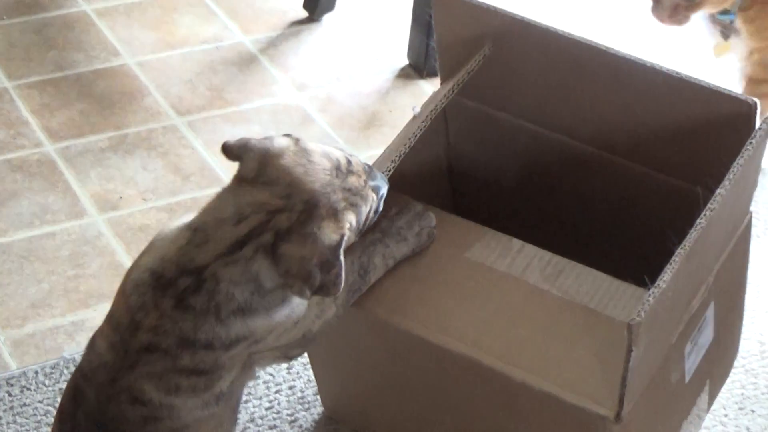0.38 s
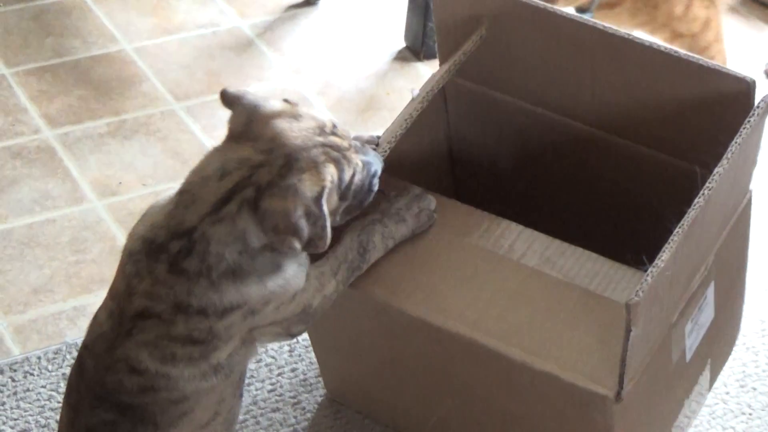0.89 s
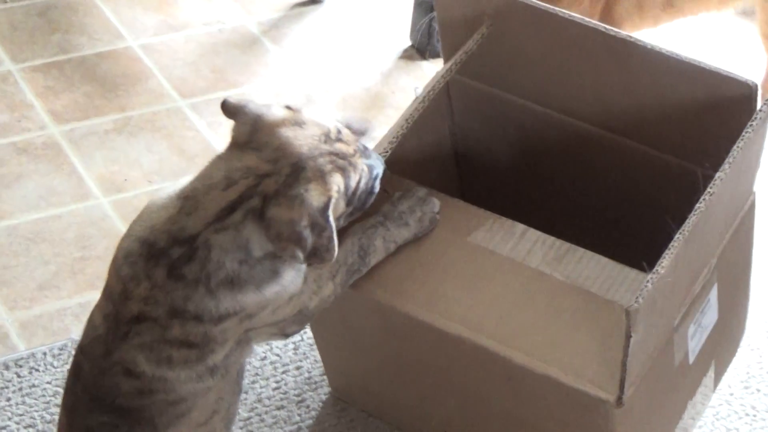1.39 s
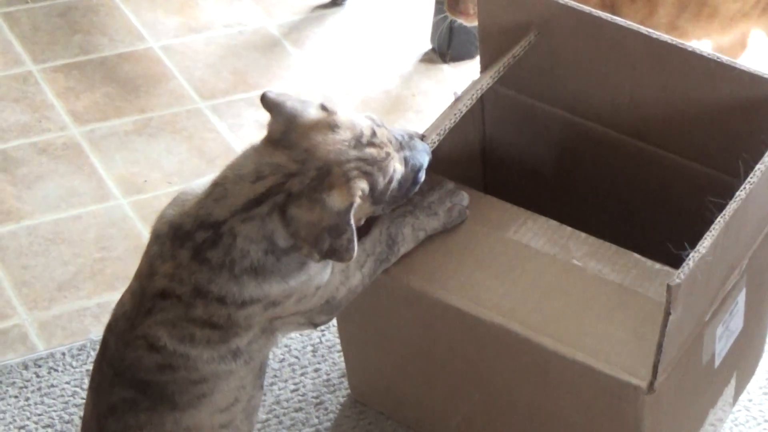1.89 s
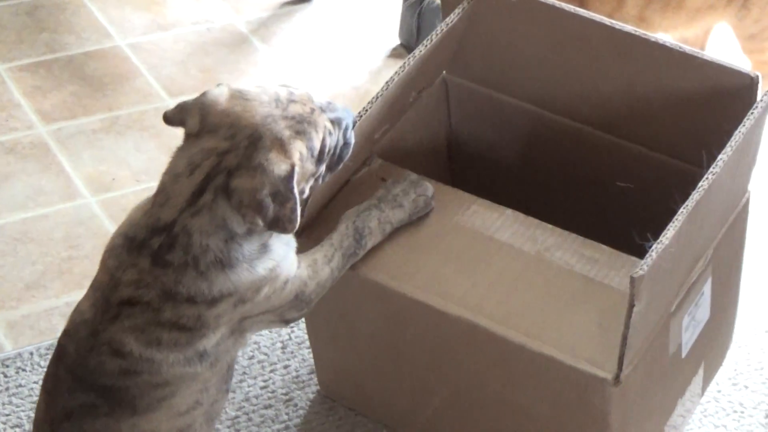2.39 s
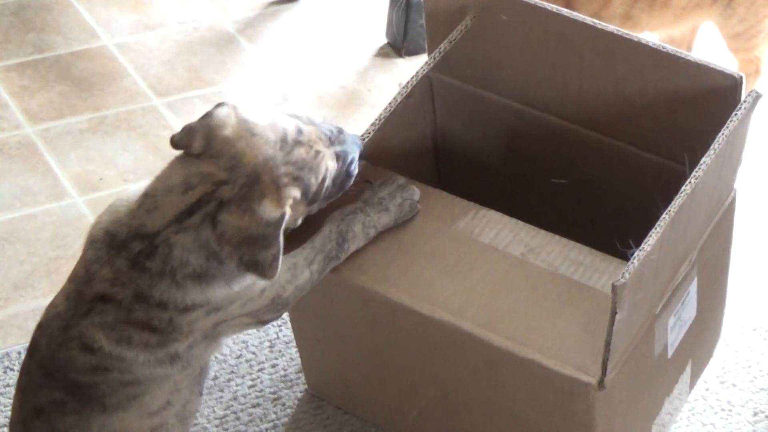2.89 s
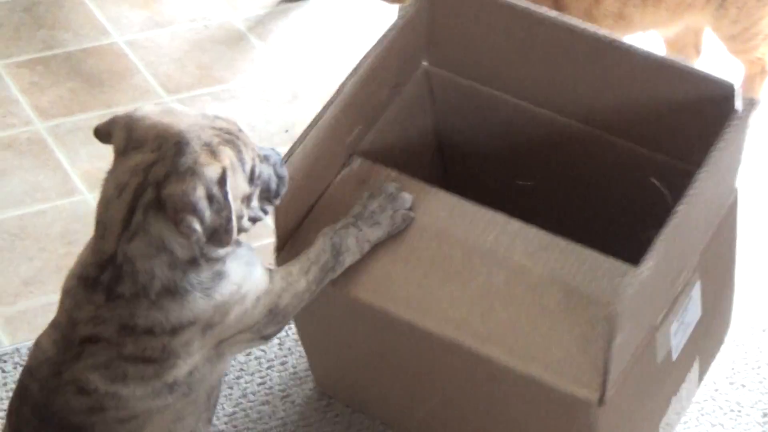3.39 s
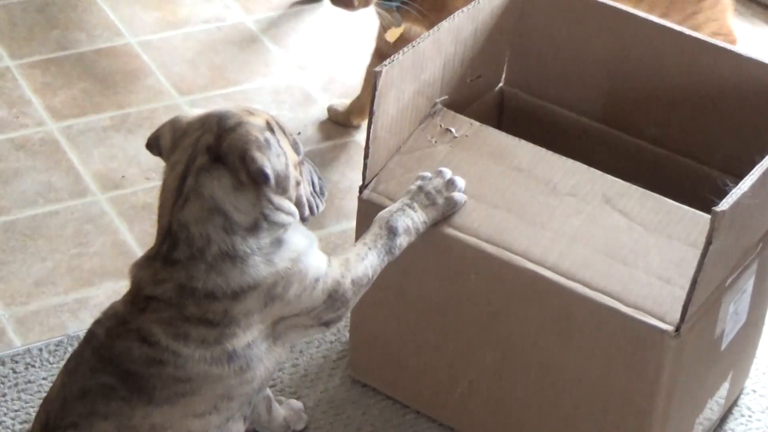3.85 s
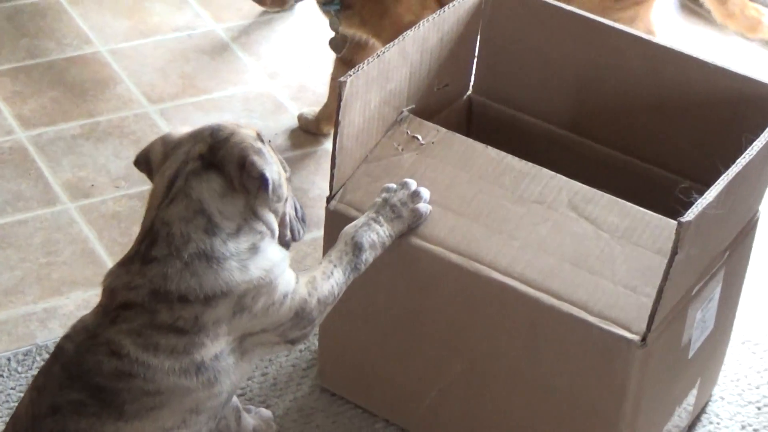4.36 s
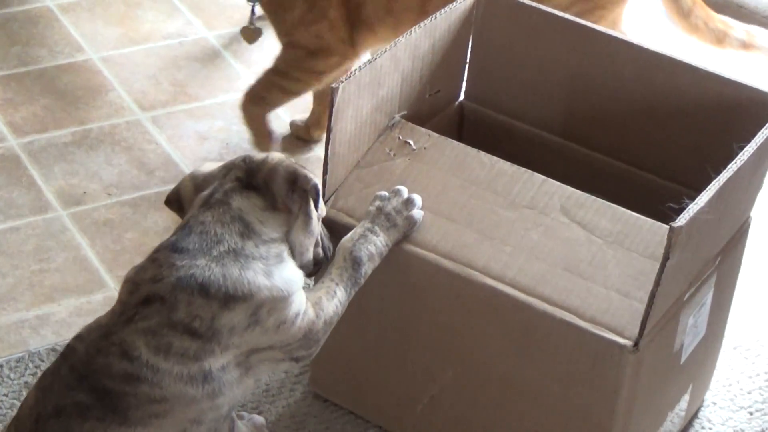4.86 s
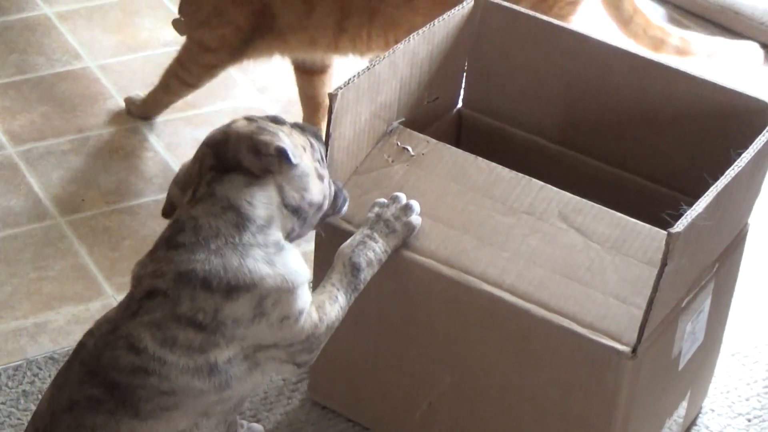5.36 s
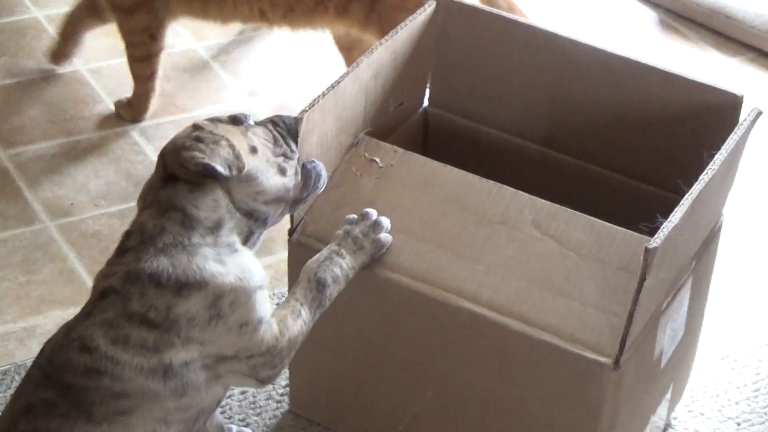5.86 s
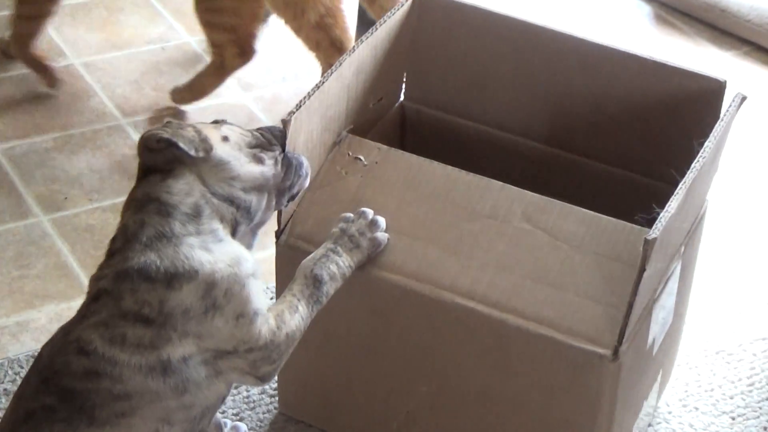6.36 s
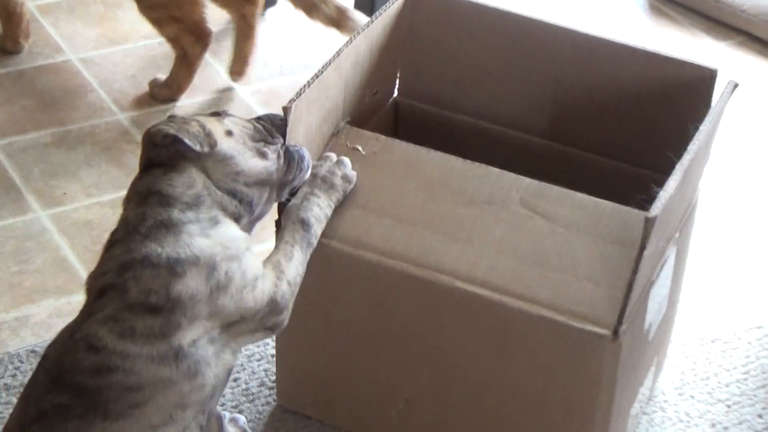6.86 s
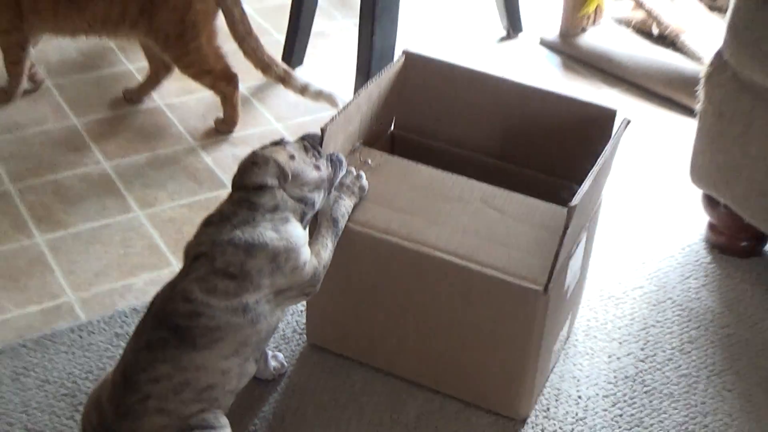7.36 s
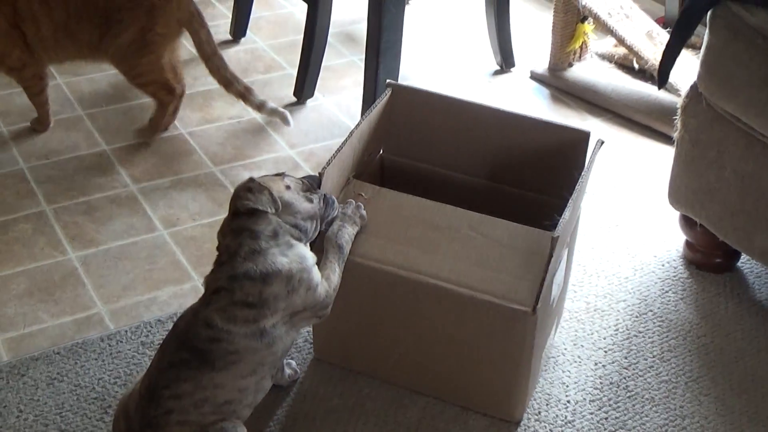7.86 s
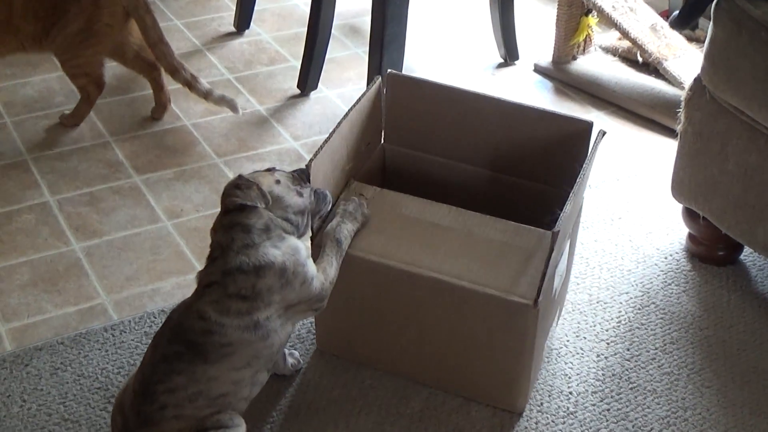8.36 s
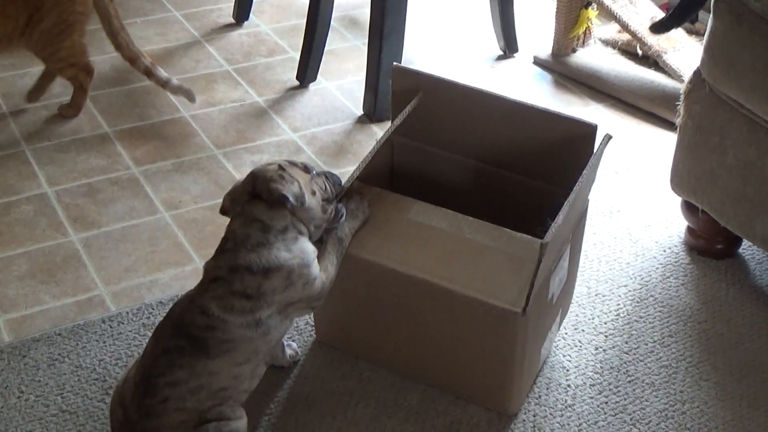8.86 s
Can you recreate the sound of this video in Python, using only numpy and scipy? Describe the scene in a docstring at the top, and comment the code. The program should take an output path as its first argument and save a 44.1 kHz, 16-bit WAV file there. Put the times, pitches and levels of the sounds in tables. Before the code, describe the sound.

A puppy paws and mouths an empty cardboard box in a quiet home. Sparse crisp ticks and short papery scrapes come first, then a busy burst with skids and a rumble as the box jerks on carpet. After a near-silent lull, scratches and hollow knocks return, denser towards the end. A low appliance hum and faint hiss continue throughout. Close microphone, small dry room.

```python
"""An appliance hums and air hisses throughout a quiet room; a puppy's leaning body faintly rustles on a box.
First ticks, then a knock at about half a second: claws and teeth crack on the cardboard and ring its panels,
while fur, pads and nose rub it in noisy strokes and skids. From 3.3 s the base also rumbles in jerks on carpet.
A lull from about 4 to 5.3 s precedes more rubbing, skids and knocks, with the loudest tick near 7.2 s.
Ticks are filtered noise bursts, knocks decaying modes, rubbing and jerks shaped noise, the hum steady sines."""
import sys
import numpy as np
from scipy import signal
from scipy.fft import rfft, irfft, next_fast_len
from scipy.io import wavfile
from scipy.ndimage import uniform_filter1d

SR = 44100
rng = np.random.default_rng(int(sys.argv[2]) if len(sys.argv) > 2 else 0)


def output_pcm(signal):
    """Save a mono or channel-first signal as 16-bit PCM at the path in sys.argv[1].

    Samples are clipped to [-1, 1] before scaling.
    """
    pcm = np.clip(np.atleast_2d(signal).T, -1, 1) * 32767
    wavfile.write(sys.argv[1], SR, np.round(pcm).astype(np.int16))


def magnitude_from_level(level_db):
    """Linear magnitude for a level in decibels (20 dB per decade)."""
    exponent = np.asarray(level_db, float) / 20
    return 10 ** exponent


N = 407484
T = np.arange(N) / SR
GRID = 32  # samples between envelope points


def colour(x, points):
    """Linear filtering: a gain curve through (frequency [Hz], gain [dB]) points shapes the spectrum."""
    hz, db = np.transpose(points)
    f = np.maximum(np.arange(len(x) // 2 + 1) * SR / len(x), 1)
    gain = magnitude_from_level(np.interp(np.log(f), np.log(hz), db))
    return irfft(rfft(x) * gain, len(x))


def resonate(x, peaks):
    """Resonance: lifts bell-shaped peaks given as (frequency [Hz], width [Hz], gain [dB])."""
    f = np.arange(N // 2 + 1) * SR / N
    lift_db = sum(db * np.exp(-((f - hz) / width) ** 2) for hz, width, db in peaks)
    return irfft(rfft(x) * magnitude_from_level(lift_db), N)


def band(x, lo_hz, hi_hz):
    """Band limiting by a Butterworth filter."""
    sos = signal.butter(2, [lo_hz, min(hi_hz, 0.45 * SR)], "band", fs=SR, output="sos")
    return signal.sosfilt(sos, x)


def unit(x):
    """Normalisation to an rms of 1."""
    return x / np.sqrt(np.mean(x ** 2))


def walk(rate):
    """Random modulation: noise held for 1/rate seconds and smoothed twice, rms 1."""
    hold = int(SR / rate)
    steps = np.repeat(rng.standard_normal(N // hold + 1), hold)
    smooth = uniform_filter1d(uniform_filter1d(steps, hold), hold)
    return unit(smooth[:N])


def add(out, s, x):
    """Superposition of a short sound at time s."""
    i = int(s * SR)
    out[i:i + len(x)] += x[:N - i]


def swell(s, rise_s, fall_s, roundness, levels_db):
    """Energy summation of events that are 20 dB down rise_s before and fall_s after their peak."""
    t = T[::GRID] - s[:, None]
    distance = np.where(t < 0, -t / np.reshape(rise_s, (-1, 1)), t / fall_s[:, None])
    return magnitude_from_level(2 * np.asarray(levels_db)) @ magnitude_from_level(-2 * 20 * distance ** roundness)


def stroke_power(s, length, levels_db):
    """Energy envelope of a stroke, which swells for somewhat less of its length than it fades."""
    rise_share = 0.44
    roundness = 1.3  # 1 = pointed top, 2 = round
    return swell(s, rise_share * length, (1 - rise_share) * length, roundness, levels_db)


# appliance and mains hum: (frequency [Hz], rms level [dB], rms waver [dB])
HUM_TONES = [(100.97, -58.5, .5), (120.02, -54.5, .3), (236.15, -42.1, .3), (239.94, -60.7, .3)]
# two motors at nearly the same speed:
# (slow frequency [Hz], fast frequency [Hz], rms level of each [dB], a silent moment [s])
MOTOR_BEAT = (56.6, 59.035, -62, .125)


def hum():
    """Beating of two close tones makes a low throb under steady motor tones."""
    slow_hz, fast_hz, beat_db, silent_s = MOTOR_BEAT
    t = T - silent_s
    total = magnitude_from_level(beat_db) * (np.sin(2 * np.pi * fast_hz * t) - np.sin(2 * np.pi * slow_hz * t))
    for hz, db, waver_db in HUM_TONES:
        total = total + magnitude_from_level(db + waver_db * walk(1.2)) * np.sin(2 * np.pi * hz * T)
    return np.sqrt(2) * total  # from rms to peak


# spectrum of the air noise: (frequency [Hz], relative level per Hz [dB])
AIR_SPECTRUM = [(12, -56), (20, -17), (108, -18.5), (174, -10.5), (211, -10.5), (236, -4.5), (288, -16.5),
                (414, -18.5), (1170, -28.5), (1310, -26.5), (1510, -31), (4140, -37.5), (10700, -39.5),
                (15000, -46), (16400, -62)]
# faint resonances in it: (frequency [Hz], width [Hz], gain [dB])
AIR_PEAKS = [(88, 17, 9), (325.3, 41, 8.5), (1300, 40, 2.5), (5630, 180, 5), (7300, 250, 4),
             (10700, 260, 2.5)]
AIR_DB = -54  # mean level, relative to an rms of 1 between 513 Hz and 15 kHz


def air():
    """Broadband random noise: ventilation rumble and microphone hiss, with a slowly wandering level."""
    x = resonate(colour(rng.standard_normal(N), AIR_SPECTRUM), AIR_PEAKS)
    return x * magnitude_from_level(AIR_DB + 0.54 * walk(2.02)) / np.std(band(x, 513, 15000))


# fur, pads and nose brush along the board, swelling and fading:
# (peak time [s], length [s], hiss level [dB], rasp level [dB], drone level [dB])
STROKES = [(0.747, 0.22, -72, -60, -55), (0.902, 0.12, -50, -56.5, -54), (1.093, .14, -47.5, -51.5, -49),
           (1.284, 0.092, -39, -43.5, -46), (1.535, 0.093, -45.5, -48.5, -50),
           (1.756, 0.22, -49, -52.5, -49), (1.83, 0.16, -56, -59, -53), (2.013, 0.089, -53, -52.5, -51),
           (2.168, .14, -46, -48.5, -46.5), (2.316, 0.14, -41, -45, -43), (2.39, 0.21, -36.5, -37, -50),
           (2.429, 0.11, -37.5, -41, -40), (2.918, .18, -52, -57, -50), (3.076, 0.27, -48, -52, -50.5),
           (3.169, 0.19, -37.5, -38, -46.5), (3.23, 0.17, -35.5, -40.5, -40.5),
           (3.424, 0.2, -39.5, -51, -43.5), (3.521, .13, -27.5, -33, -32.5), (3.562, 0.12, -36, -39, -50),
           (3.657, 0.16, -43, -45, -45.5), (3.767, 0.24, -47.5, -51, -52), (3.862, 0.09, -49, -54, -50),
           (5.344, 0.2, -46, -59, -60), (5.545, .1, -54, -55, -53), (5.793, 0.32, -47.5, -51.5, -53),
           (5.975, 0.33, -51.5, -54.5, -60), (6.335, 0.17, -55.5, -52.5, -44.5),
           (6.43, 0.11, -56, -60, -51), (6.562, 0.047, -47, -68, -66), (6.656, 0.09, -49, -58, -62),
           (7.317, 0.25, -50.5, -66, -62), (7.571, 0.094, -52, -60, -61), (7.768, 0.24, -45.5, -53.5, -53),
           (7.96, 0.11, -53, -61, -52), (8.013, .08, -30, -40.5, -41), (8.037, 0.056, -34, -45, -44),
           (8.121, 0.11, -40, -51, -53), (8.183, .1, -46.5, -54, -48.5), (8.433, 0.22, -53, -65, -66),
           (8.601, 0.15, -48, -56, -53), (8.711, 0.15, -49.5, -57, -51), (8.782, 0.18, -47.5, -56, -57),
           (8.895, 0.061, -48.5, -54, -54), (9.099, 0.078, -45, -46, -41.5),
           (9.138, 0.076, -44.5, -51.5, -61)]
# a paw or tooth slips suddenly and skids to rest:
# (peak time [s], time to fade 20 dB [s], hiss level [dB], rasp level [dB], drone level [dB])
SKIDS = [(0.547, 0.06, -35.5, -37.5, -41), (1.462, 0.14, -46, -47, -42.5), (2.715, 0.11, -39, -40.5, -39.5),
         (3.436, 0.22, -32.5, -38, -39), (3.592, 0.0549, -26.5, -36.5, -39), (5.666, 0.05, -43, -54, -52),
         (5.747, 0.0338, -30, -40, -38), (6.885, 0.06, -39.5, -47, -40), (7.226, .08, -31, -42, -37.5),
         (7.477, 0.03, -54, -48, -38), (7.802, 0.0741, -32, -35.5, -34.5), (7.984, 0.17, -42, -48, -45),
         (8.097, 0.17, -46, -49, -50), (8.311, 0.08, -40, -49, -40), (8.332, 0.11, -41, -45, -42),
         (8.932, 0.16, -44, -48, -46), (8.988, 0.14, -40, -48, -42), (9.01, 0.16, -48, -54, -50)]
SKID_ATTACK_S, SKID_ROUNDNESS = 0.0061, 1.08
# faint steady rustle of the leaning body: (time [s], hiss level [dB])
LEAN = [(0, -60.5), (.55, -65), (.8, -62), (3.9, -66.5), (5.2, -64.5), (6.4, -62), (6.8, -63), (7.6, -57.5),
        (8.3, -61), (9.24, -61.5)]
LEAN_RASP_DB, LEAN_DRONE_DB = -4.5, -0.5  # against the hiss


def contact():
    """Sliding contact: energies of strokes, skids and leaning add to levels [dB] of hiss, rasp and drone."""
    s, length, *levels_db = np.transpose(STROKES)
    power = stroke_power(s, length, levels_db)
    s, fall_s, *levels_db = np.transpose(SKIDS)
    power = power + swell(s, SKID_ATTACK_S, fall_s, SKID_ROUNDNESS, levels_db)
    lean_hiss_db = np.interp(T[::GRID], *np.transpose(LEAN))
    lean_db = lean_hiss_db + np.array([[0], [LEAN_RASP_DB], [LEAN_DRONE_DB]])
    return [np.interp(T, T[::GRID], 10 * np.log10(p)) for p in power + magnitude_from_level(2 * lean_db)]


def patchy(x, points, patchy_db, rate):
    """Independent band modulation: each third of an octave swells and fades on its own; rms 1."""
    lowest_hz, highest_hz = points[0][0], points[-1][0]
    edges = lowest_hz * 2 ** np.arange(0, np.log2(highest_hz / lowest_hz) + 1 / 3, 1 / 3)
    spectrum = rfft(colour(x, points))
    f = np.arange(N // 2 + 1) * SR / N
    total = np.zeros(N)
    for lo, hi in zip(edges, edges[1:]):
        total += irfft(spectrum * ((f >= lo) & (f < hi)), N) * magnitude_from_level(patchy_db * walk(rate))
    return unit(total)


# flutes of the board that colour all rubbing: (frequency [Hz], width [Hz], gain [dB])
FLUTES = [(940, 97, 2), (1136, 98, 3.5), (2050, 150, 0.5), (2480, 130, 1), (4700, 75, 3.5), (5830, 460, 3),
          (9100, 1900, 0)]
# spectra of hiss (before its split into two bands), rasp and drone:
# each (frequency [Hz], relative level per Hz [dB])
HISS = [(2060, -7), (3500, -9.5), (4430, -6.5), (5130, -6.5), (6400, -2.5), (9030, 5), (12900, -18.5),
        (14900, -18), (16000, -56)]
RASP = [(820, -12), (1400, -2.5), (1660, -2), (2120, 0), (2350, -4), (2550, -2), (3500, -6), (4550, -16),
        (7700, -120)]
DRONE = [(260, -46), (450, -4.5), (613, -6), (788, -1), (863, -3), (926, -2), (1400, -11), (1820, -17),
         (3080, -120)]
CRACKLE_PER_S, CRACKLE_DB = 500, -10  # snapping fibres: mean rate, and rms level against the hiss


def rubbing():
    """Stick-slip friction: fibres catch and let go in grains, as bright hiss, papery rasp and board drone."""
    hiss_db, rasp_db, drone_db = contact()
    grains = rng.standard_normal((3, N)) * magnitude_from_level(2.3 * rng.exponential(size=(3, N)))
    grains *= magnitude_from_level(1.7 * walk(220))  # the grip stutters every few milliseconds
    grains = [resonate(g, FLUTES) for g in grains]

    hiss = patchy(grains[0], HISS, 0.94, 70)
    lower_band = unit(band(hiss, 3100, 7450))
    upper_band = unit(band(hiss, 8960, 16300))
    # light strokes are thinner: the softer the hiss, the stronger its upper band against the lower
    upper = magnitude_from_level(-2 - 0.085 * (hiss_db + 43.5))
    hiss = (lower_band + upper * upper_band) / np.sqrt(1 + upper ** 2)
    snaps = (rng.uniform(size=N) < CRACKLE_PER_S / SR) * rng.standard_normal(N)
    hiss = hiss + magnitude_from_level(CRACKLE_DB) * unit(band(snaps, 2600, 9300))
    hiss = hiss * magnitude_from_level(1.3 * walk(45))

    rasp = patchy(grains[1], RASP, 2.3, 60)
    drone = patchy(grains[2], DRONE, 2.3, 30)
    return hiss * magnitude_from_level(hiss_db) + rasp * magnitude_from_level(rasp_db) + drone * magnitude_from_level(drone_db)


ROOM_T60_S, ROOM_GAP_S = 0.31, 0.0068


def room(x):
    """Reverberation: a diffuse decaying noise tail after a short gap, duller as it dies."""
    t = T[:SR // 2]
    fade = np.exp(-np.log(1000) * t / ROOM_T60_S) * (t > ROOM_GAP_S)
    noise = rng.standard_normal(len(t))
    low = band(noise, 83, 5400)
    tail = fade * (low + (noise - low) * fade ** 0.67)  # the remainder fades faster
    return signal.fftconvolve(x, tail / np.sqrt(np.sum(tail ** 2)))[:N]


# claw and tooth ticks, before TICK_COLOUR:
# (time [s], peak level [dB], nominal low edge [Hz], nominal high edge [Hz])
CRACKS = [(.1272, -34.5, 2280, 8500), (.2295, -37, 1300, 3360), (0.391, -33, 4000, 11100),
          (.4672, -37, 4000, 11300), (0.519, -36, 3000, 11000), (.545, -17, 1600, 9550),
          (0.5606, -24, 2100, 7100), (.656, -38, 1500, 2600), (0.694, -39.5, 990, 2600),
          (1.1016, -38, 1300, 8500), (1.2384, -35, 3800, 10300), (1.2715, -26, 2000, 9000),
          (1.2881, -22.5, 2200, 9200), (1.4595, -20, 2000, 9650), (2.2884, -27, 3500, 11000),
          (2.452, -22, 4220, 9400), (2.714, -16, 1970, 6470), (2.7261, -21.5, 2000, 6100),
          (3.2564, -24, 2690, 8000), (3.4339, -16, 4700, 11000), (3.443, -10, 3400, 11500),
          (3.494, -16, 4000, 10400), (3.5055, -15, 2500, 6560), (3.508, -14, 2500, 8900),
          (3.589, -13.5, 3200, 9000), (3.7144, -30, 3000, 9000), (3.856, -29, 2400, 10300),
          (5.5364, -29, 2400, 8650), (5.6627, -25.5, 5170, 11400), (5.689, -28, 4100, 11600),
          (5.737, -20, 5570, 12300), (5.743, -16, 3800, 10700), (5.7456, -11, 3370, 11400),
          (5.792, -30, 3000, 13000), (6.528, -36.5, 2600, 10100), (6.6016, -32, 3400, 10700),
          (6.884, -22, 2400, 9000), (6.8923, -24.5, 3500, 6700), (7.2244, -6, 2800, 8900),
          (7.2269, -14.5, 3400, 8200), (7.2373, -27, 1600, 8800), (7.339, -28, 4400, 9500),
          (7.3454, -26.5, 4500, 9800), (7.477, -20.5, 1580, 5240), (7.48, -19.5, 1300, 2980),
          (7.7037, -28.5, 3720, 10400), (7.8054, -17, 3520, 9000), (7.808, -17.5, 2380, 7300),
          (7.8876, -30, 2800, 7100), (7.983, -34, 2300, 9900), (7.999, -18, 3000, 10000),
          (8.112, -23.5, 3900, 10700), (8.116, -27, 3920, 9800), (8.1598, -27, 2500, 9800),
          (8.314, -20.5, 4500, 8400), (8.3217, -22.5, 2500, 9000), (8.333, -15.5, 4130, 9800),
          (8.3402, -20.5, 3500, 8900), (8.2036, -30, 2500, 9700), (8.2283, -34.5, 5400, 11100),
          (8.7578, -30.5, 4000, 9500), (8.8708, -25.5, 4100, 7360), (8.9314, -24, 4400, 9550),
          (8.9361, -23, 4300, 9100), (8.941, -26, 2400, 8800), (8.9488, -19.5, 4420, 9100),
          (8.979, -16.5, 4500, 8800), (8.991, -22.5, 4500, 8700), (9.0395, -29, 4100, 7800),
          (9.0702, -30, 4200, 9100), (9.077, -22, 4300, 9300), (9.087, -22.5, 4400, 8100),
          (9.1056, -23, 4070, 7300)]
# spectral colour of the ticks: (frequency [Hz], gain [dB])
TICK_COLOUR = [(20, 1), (9000, -0.5), (11500, 3.5), (13000, 2), (16000, -8), (22000, -40)]
CRACK_T60_S = 0.012  # of the noise burst before filtering


def cracks():
    """Impulsive excitation: each tick is a sharp edge and a brief splinter of noise, with a weaker bounce."""
    out, t = np.zeros(N), T[:SR // 20]
    noise = rng.standard_normal((len(CRACKS), len(t))) * np.exp(-np.log(1000) * t / CRACK_T60_S)
    noise[:, 0] = 5.5  # the sharp edge
    chance = rng.uniform(size=(len(CRACKS), 2))
    for (s, db, lo_hz, hi_hz), burst, (late, size) in zip(CRACKS, noise, chance):
        crack = band(burst, 0.86 * lo_hz, 0.98 * hi_hz)
        crack = band(crack, 0.76 * lo_hz, 1.4 * hi_hz)
        crack = magnitude_from_level(db) * crack / np.max(np.abs(crack))
        add(out, s, crack)
        bounce_delay_s = 0.003 + 0.006 * late
        bounce_db = -17 + 6 * size
        add(out, s + bounce_delay_s, magnitude_from_level(bounce_db) * crack)
    return colour(out, TICK_COLOUR)


def ring(modes, chance, weight_db, push_s):
    """Modal decay of a struck part, peak 1; each blow detunes the modes a little."""
    t = T[:SR // 3]
    hz, db, t60 = (c[:, None] for c in np.transpose(modes))
    hz = hz * (1 + 0.012 * chance[0][:, None])
    phase = 0.94 * chance[1][:, None]
    decay = np.exp(-np.log(1000) * t / t60)
    y = np.sum(magnitude_from_level(db + weight_db) * decay * np.sin(2 * np.pi * hz * t + phase), axis=0)
    y *= 1 - np.exp(-t / push_s)  # soft onset
    return y / np.max(np.abs(y))


# knocks on the box: (time [s], panel peak level [dB], favoured panel frequency [Hz],
# board peak level [dB], favoured board frequency [Hz])
THUMPS = [(.545, -28.5, 200, -24.5, 893), (1.27, -59, 293, -37, 1851), (1.459, -30.5, 390, -31, 895),
          (2.29, -39.5, 244, -37, 675), (2.714, -28.5, 370, -34, 900), (2.755, -33.5, 390, -49, 900),
          (3.294, -35, 294, -35, 800), (3.446, -38, 207, -31, 1211), (3.505, -24, 205, -25.5, 1073),
          (3.591, -35, 255, -33, 1900), (3.67, -31, 195, -40, 1044), (3.854, -48, 264, -42, 640),
          (5.536, -27.5, 220, -41, 794), (5.558, -32, 210, -44, 640), (5.744, -27.5, 214, -41, 901),
          (6.313, -37.5, 229, -35, 958), (6.885, -39, 140, -36, 968), (7.224, -31.5, 414, -49, 796),
          (7.239, -30.5, 156, -34, 1485), (7.275, -35.5, 480, -46, 640), (7.61, -33, 310, -49, 600),
          (7.806, -16.5, 215, -30, 1127), (7.85, -29, 240, -46, 686), (7.999, -26.5, 324, -31, 864),
          (8.113, -34, 264, -48, 820), (8.18, -35, 316, -43, 640), (8.339, -29.5, 232, -31, 624),
          (8.93, -40, 177, -37, 740), (8.98, -34.5, 220, -40, 1030)]
# modes of the box panels and of the board: each (nominal frequency [Hz], relative level [dB], T60 [s])
PANELS = [(87.5, -6.5, 0.22), (141.4, -4.5, 0.16), (201.8, 0, 0.14), (255, -2.5, 0.12), (316, -4.5, 0.11),
          (372.2, -2, 0.13), (409, 0, 0.12), (468, -3, 0.061)]
BOARD = [(640, -5, 0.05), (764, -2, 0.047), (897, -0.5, 0.06), (1044, 1, 0.076), (1199, 4, 0.055),
         (1480, -1, 0.076), (1873, -8, 0.073), (2130, -23, .05), (2600, 8, 0.04)]


def thumps():
    """Position-dependent modal excitation: a knock rings mostly the panels and the board near the paw."""
    out = np.zeros(N)
    chance = rng.standard_normal((len(THUMPS), 2, len(BOARD)))
    panel_modes_hz = np.array(PANELS)[:, :1]
    board_modes_hz = np.array(BOARD)[:, :1]
    for (s, panel_db, panel_hz, board_db, board_hz), luck in zip(THUMPS, chance):
        near_db = -17 * np.abs(np.log2(panel_modes_hz / panel_hz))  # loss per octave away
        add(out, s, magnitude_from_level(panel_db) * ring(PANELS, luck[:, -len(PANELS):], near_db, 0.011))
        near_db = -34 * np.abs(np.log2(board_modes_hz / board_hz))
        add(out, s, magnitude_from_level(board_db) * ring(BOARD, luck, near_db, 0.0031))
    return out


# the box base jerks over the carpet: (peak time [s], length [s], rumble level [dB])
JERKS = [(3.31, 0.079, -40), (3.375, 0.072, -37), (3.442, 0.1, -38.5), (3.61, .33, -37), (3.82, .25, -52),
         (7.818, .15, -39)]
# spectrum of the rumble: (frequency [Hz], relative level per Hz [dB])
RUMBLE = [(30, -14), (60, -18), (85, 3), (130, -13), (250, 1.5), (450, -9.5), (800, -53)]


def slide():
    """Friction noise: the box base drags on the pile and rumbles."""
    power = stroke_power(*np.transpose(JERKS))
    rumble = unit(colour(rng.standard_normal(N), RUMBLE))
    return rumble * np.interp(T, T[::GRID], np.sqrt(power))


# side colour of the near sounds, before their trims: (frequency [Hz], gain [dB])
PUP_WIDTH = [(60, -33), (110, -30), (200, -20), (380, -22), (700, -14.5), (1290, -14.5), (2380, -14),
             (4400, -13), (8120, -14), (15000, -33)]
# side colour of the room air and hum: (frequency [Hz], side minus mid level [dB])
AIR_WIDTH = [(60, -39), (110, -36), (200, -39.5), (380, -14), (700, -6.5), (1290, -4.5), (2380, -3),
             (4400, -6), (8120, -8), (15000, -23)]
ROOM_DB = -11


def scene():
    """Mid-side stereo: close microphones differ in the diffuse sound and a slight phase lead."""
    tone = hum()
    ticks, body = cracks(), rubbing() + thumps() + slide()
    pup = ticks + body
    # ticks beam towards the microphones, so the walls get less of them
    echo = magnitude_from_level(ROOM_DB) * room(body + magnitude_from_level(-16) * ticks)
    mid = pup + echo + tone + air()
    quadrature = np.imag(signal.hilbert(pup, next_fast_len(N)))[:N]
    near_side = colour(magnitude_from_level(-3.5) * room(pup) - magnitude_from_level(-6.0) * quadrature, PUP_WIDTH)
    side = near_side + colour(air() + tone, AIR_WIDTH)
    return np.array([mid + side, mid - side])


def roll_off(x):
    """The treble ends steeply here."""
    return signal.sosfilt(signal.butter(12, 16520, fs=SR, output="sos"), x)


def record(dry):
    """Signal chain: passes on the finished stereo mix at unchanged gain."""
    return roll_off(dry)


dry = scene()
out = record(dry)
output_pcm(out)
```